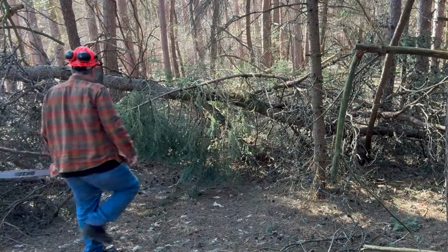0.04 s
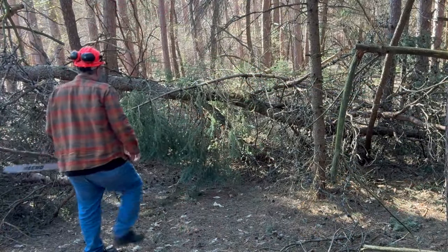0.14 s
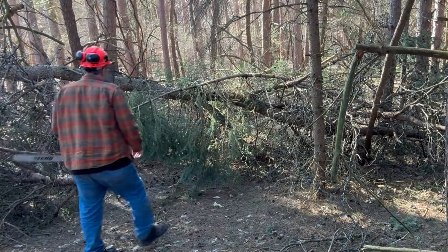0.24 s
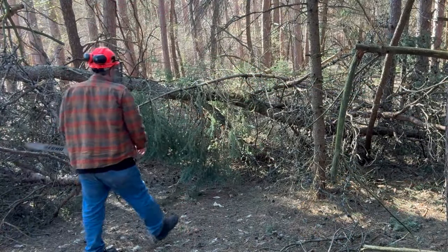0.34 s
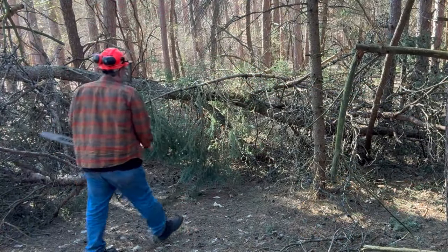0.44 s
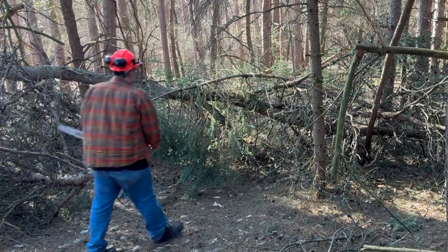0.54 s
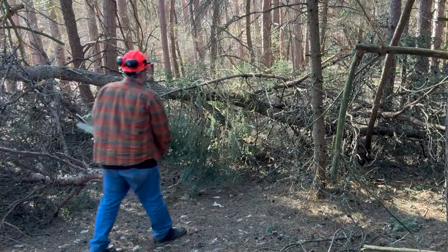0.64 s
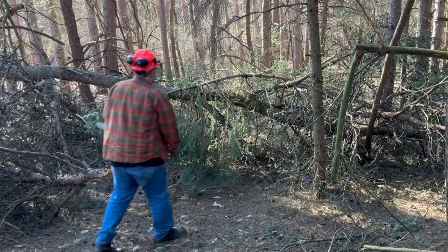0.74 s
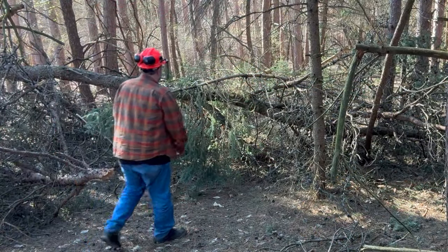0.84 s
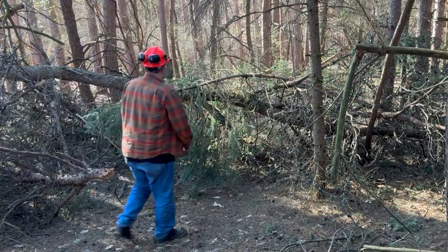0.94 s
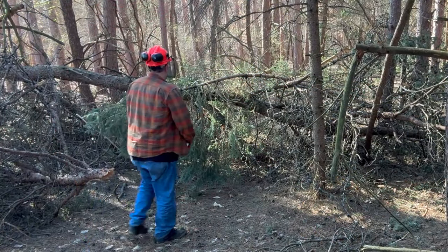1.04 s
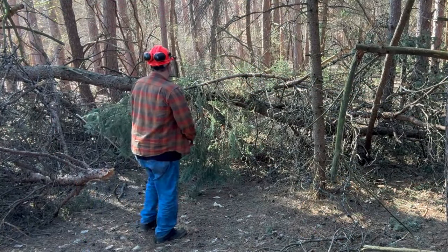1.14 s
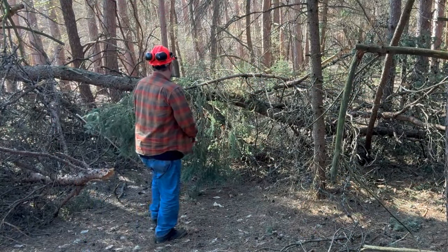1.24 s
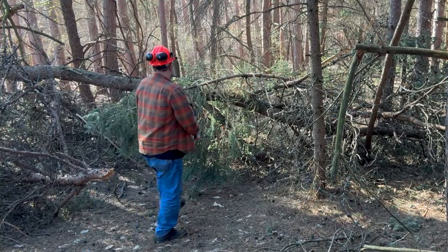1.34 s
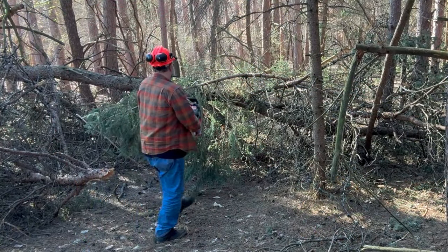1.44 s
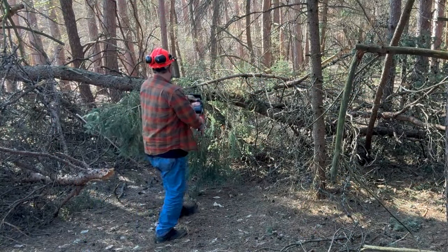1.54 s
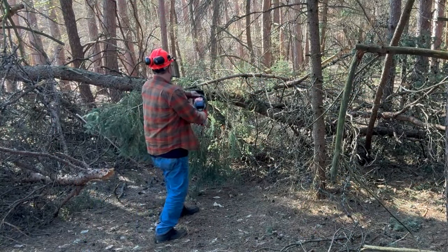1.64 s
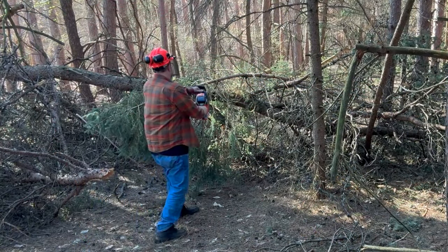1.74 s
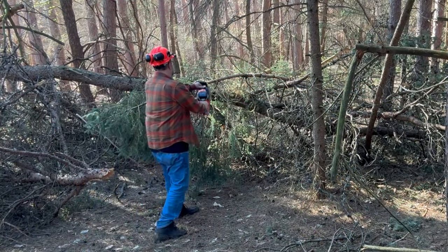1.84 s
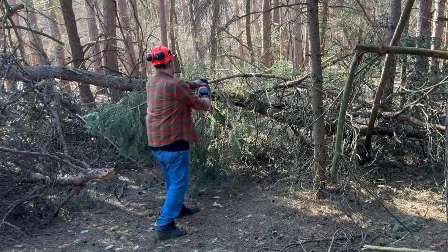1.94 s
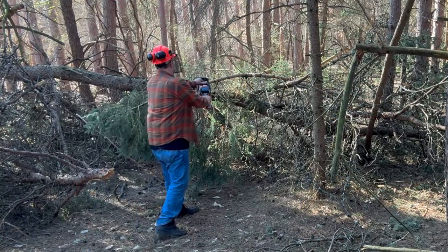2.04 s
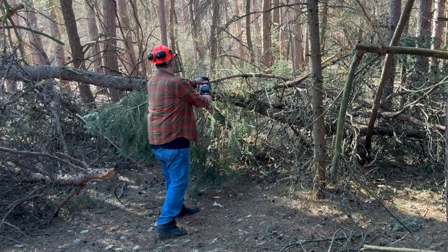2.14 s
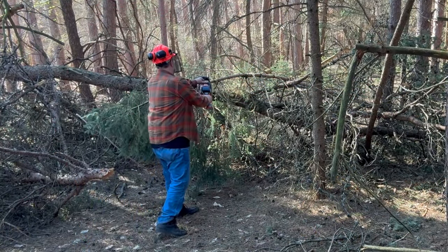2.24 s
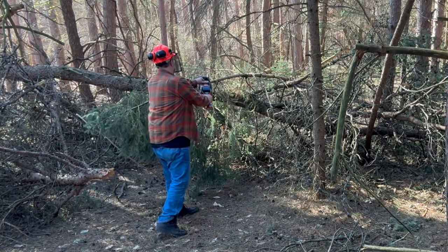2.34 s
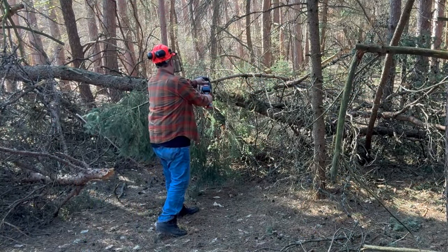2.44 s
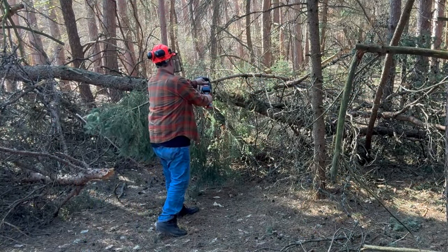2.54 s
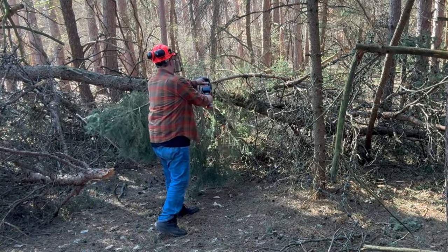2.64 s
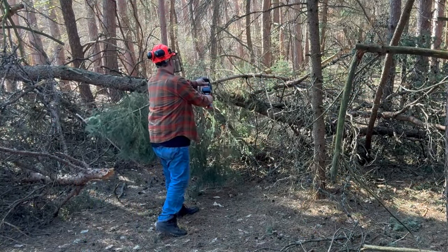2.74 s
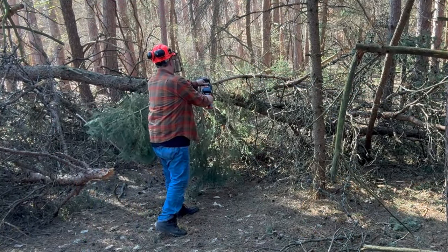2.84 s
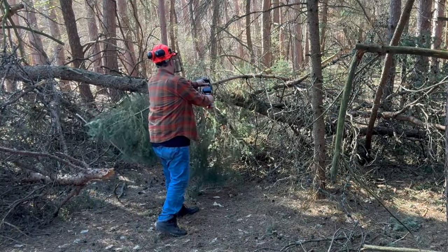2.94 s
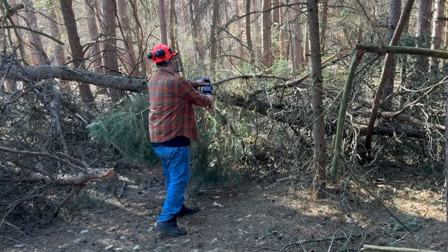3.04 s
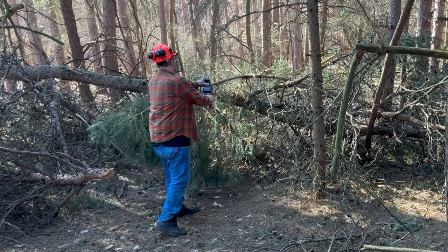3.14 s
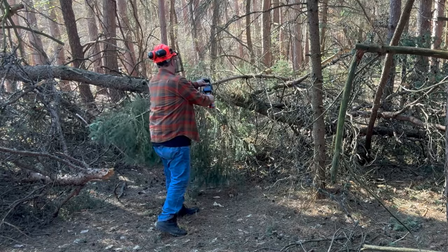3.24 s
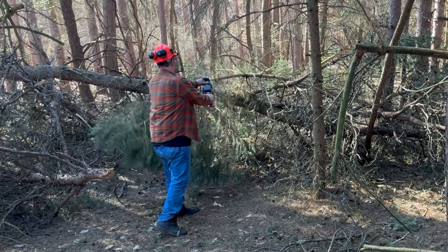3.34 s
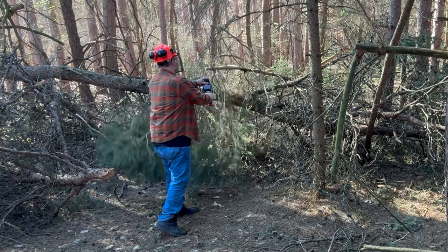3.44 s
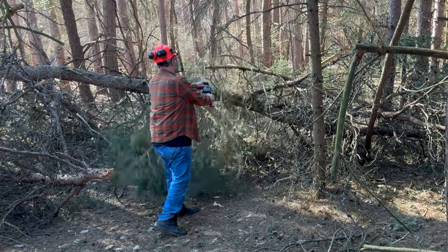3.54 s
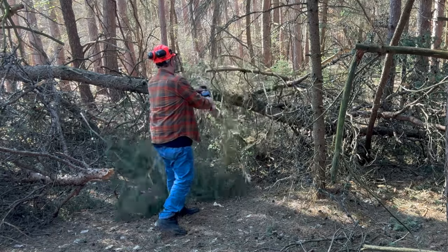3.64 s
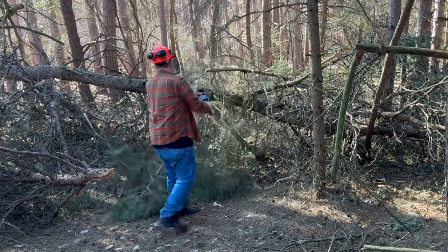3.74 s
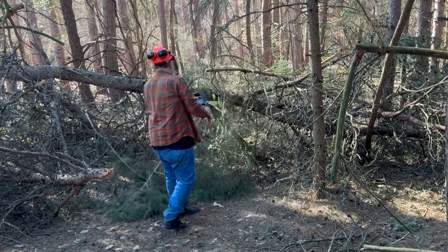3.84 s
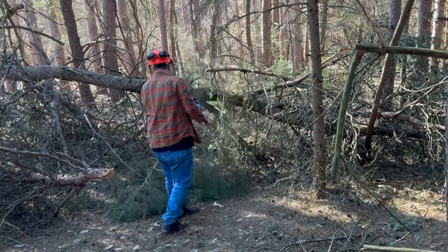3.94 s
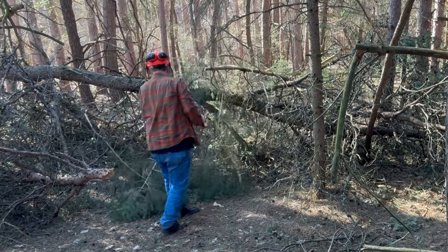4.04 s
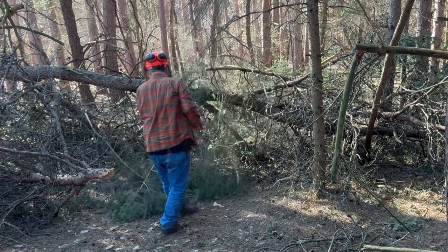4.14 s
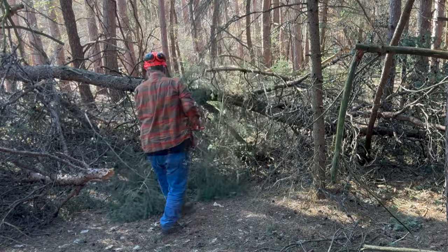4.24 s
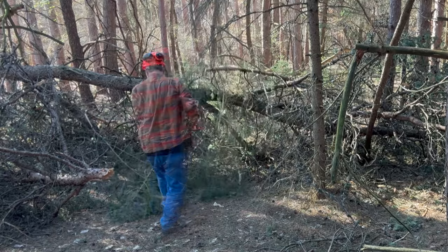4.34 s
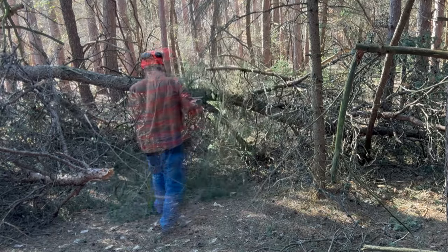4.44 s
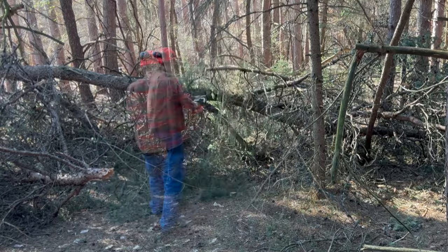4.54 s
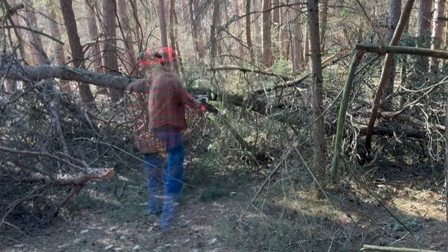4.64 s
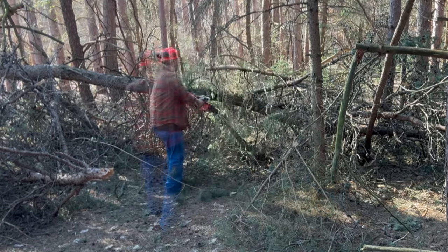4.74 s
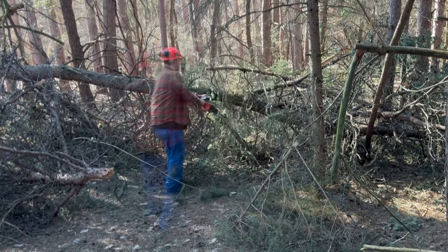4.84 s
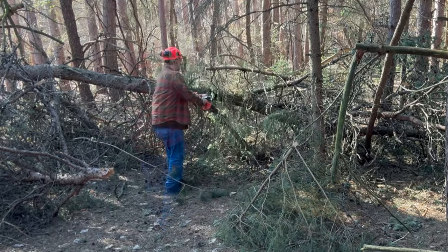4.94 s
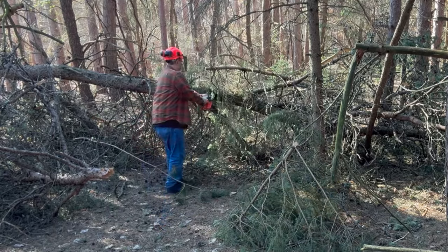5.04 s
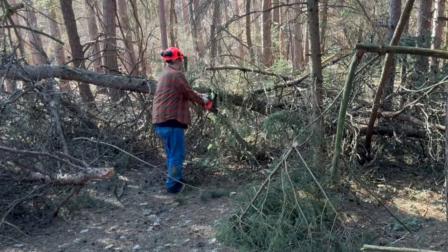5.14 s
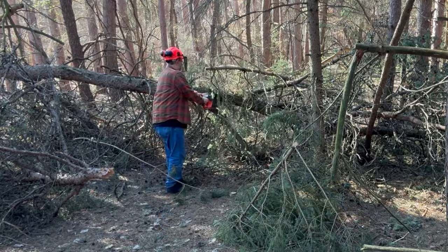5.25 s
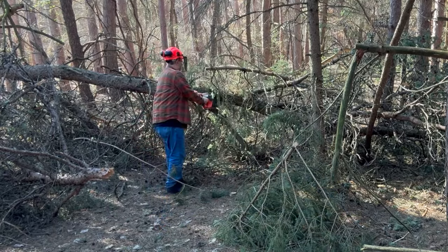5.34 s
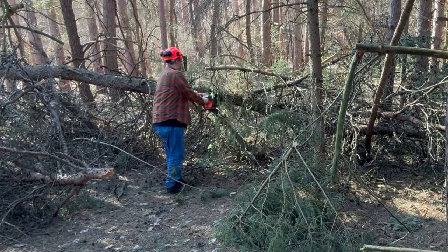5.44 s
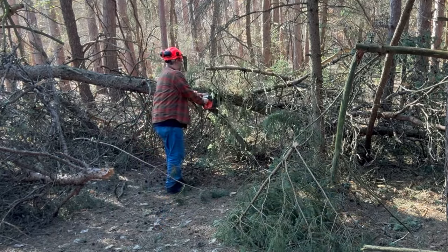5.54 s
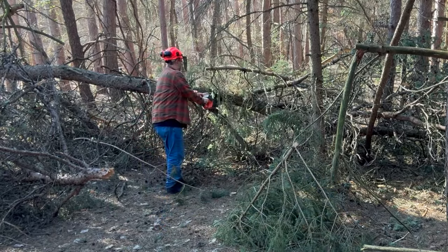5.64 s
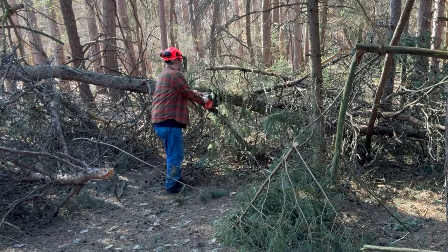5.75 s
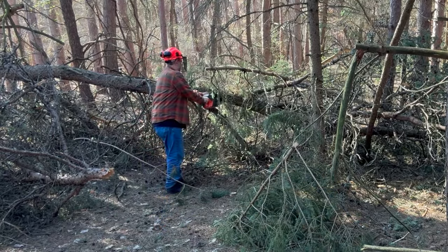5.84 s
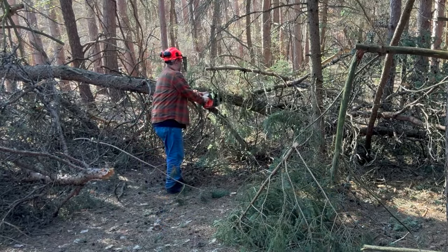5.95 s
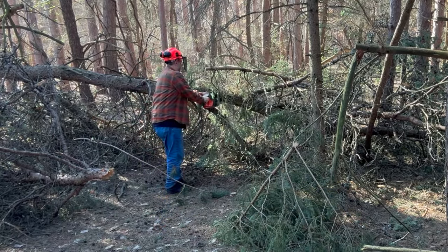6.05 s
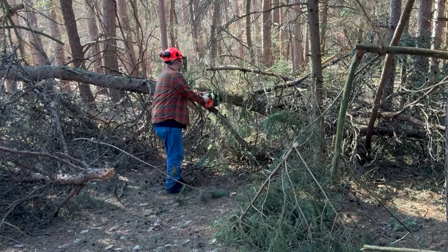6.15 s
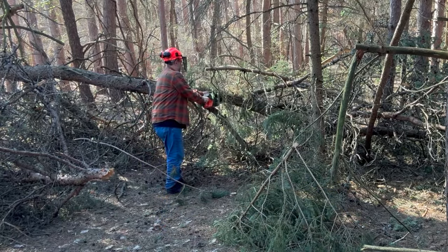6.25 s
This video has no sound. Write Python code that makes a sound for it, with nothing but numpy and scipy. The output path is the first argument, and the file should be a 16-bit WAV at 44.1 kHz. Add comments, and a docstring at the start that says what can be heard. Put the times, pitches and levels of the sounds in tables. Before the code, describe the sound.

A still forest with a soft low murmur and slight wind rumble, heard in stereo from a few metres away. From 0 to 1.6 s, light steps crackle on dry needles; around 0.3 s soft distant whistles, probably birds, blur away among the trees. Twigs brush near 1.5 s, and low gusts bump the microphone around 1.7 to 1.95 s with small knocks at 1.9. At about 2.05 s a battery chainsaw starts with loose chain clatter and a knock, sweeping up to a full buzzing whine with rattle and hiss by 3.0 s. The rattle eases slightly at 3.1; pitch peaks near 3.6, then falls until the brake cuts it at 4.1 s with a clack. In the lull, a faint whistle, a dragged branch rustling, and crunching twigs at 4.8. Knocks accompany the second start from 4.75; it climbs to a steadier, wavering whine by 5.8 and runs to the end.

```python
"""Limbing a fallen pine

A man walks over dry needles to a fallen pine and limbs it with a battery chainsaw, a few metres away
in a still forest. The saw winds up, takes off a branch and is braked; a second run follows.
One shaft phase drives the sprocket tone, the motor whine and the chain's noise pulses and slaps.
Shaped noise makes the steps, the knocks, the forest's murmur and the wind's rumble on the microphones;
wavering sines of fixed pitch make far whistles."""
import sys
import numpy as np
from scipy import signal
from scipy.fft import rfft, irfft, next_fast_len
from scipy.io import wavfile
from scipy.ndimage import uniform_filter1d

SR = 44100
rng = np.random.default_rng(int(sys.argv[2]) if len(sys.argv) > 2 else 0)


def wav_out(sig):
    """Save sig, one row per channel (or a flat mono array), as 16-bit PCM at SR to the path in sys.argv[1]."""
    wavfile.write(sys.argv[1], SR, np.round(np.clip(np.atleast_2d(sig).T, -1, 1) * 32767).astype(np.int16))


N = 277389
TIME = np.arange(N) / SR
SIZE = next_fast_len(N + SR // 2)
BINS = np.maximum(np.arange(SIZE // 2 + 1) * SR / SIZE, 1)  # spectrum frequencies in Hz
HALVES = np.array([[.5], [-.5]])  # shares a left-minus-right difference between the sides
WORKING_HZ = 700  # link rate at which levels are given

# coherence of the saw's and the litter's noise between the microphones: pitch_hz, likeness (0-1)
SAW_LIKENESS = [(150, 0.92), (350, 1), (700, 0.35), (1550, 1), (2200, 0.18), (5500, 0.88), (7800, 0.068),
                (9300, 1), (10500, 0.45), (12000, 1), (15000, 1)]


def from_db(db):
    """Amplitude gain is ten to the power of a twentieth of the decibels."""
    return 10 ** (np.asarray(db) / 20)


def rms_one(x):
    """Dividing by the root mean square gives a signal unit power."""
    return x / np.sqrt(np.mean(x ** 2) + 1e-20)


def level(rows):
    """An envelope linear in decibels between its rows, with Gaussian fades just outside them."""
    rows = np.array(rows)
    outside = np.maximum(rows[0, 0] - TIME, TIME - rows[-1, 0]).clip(0)
    fade = np.exp(-(outside / 0.027) ** 2)
    return from_db(np.interp(TIME, rows[:, 0], rows[:, 1])) * fade


def at_hz(points, hz=BINS):
    """A spectrum interpolated on a logarithmic frequency axis, as pitch is heard."""
    points = np.array(points)
    return np.interp(np.log(hz), np.log(points[:, 0]), points[:, 1])


def drift(rate_hz):
    """White noise through a two-pole low-pass becomes a slow random wander of unit power."""
    step = 40  # samples between the wander's points
    pole = np.exp(-2 * np.pi * rate_hz * step / SR)
    white = rng.standard_normal(N // step + 2002)
    slow = signal.lfilter([1], [1, -2 * pole, pole * pole], white)[2000:]
    return np.interp(np.arange(N) / step, np.arange(len(slow)), rms_one(slow))


def resonance_db(modes, hz):
    """Each resonance lifts or dips the level along a bell centred on its own frequency."""
    return sum(db / (1 + (2 * (hz - centre) / width) ** 2) for centre, width, db in modes)


def noise_spectra(colour_db, likeness):
    """Sum and difference of two independent noises set the coherence between the sides."""
    alike = np.clip(at_hz(likeness), 0, .99)
    mid, side = rfft(rng.standard_normal((2, SIZE)))
    pair = np.sqrt(1 + alike) * mid + np.sqrt(1 - alike) * side * [[1], [-1]]
    return pair * from_db(colour_db)


def unit_in_band(spectra, band):
    """By Parseval's theorem the bins in a band give its power: the centre signal's rms there is made 1."""
    inside = spectra.mean(0)[(BINS > band[0]) & (BINS < band[1])]
    return irfft(spectra, SIZE)[:, :N] * SIZE / np.sqrt(2 * np.sum(abs(inside) ** 2))


def with_speed(link_hz, db_per_octave):
    """Radiated level grows by a fixed number of decibels per doubling of chain speed."""
    return from_db(db_per_octave * np.log2(link_hz / WORKING_HZ))


def saw(speed, response, swing, shell, colour, bar, load, axis, tone_db, octave_db, ragged_db,
        whine_db, slow_whine_db, rattle_db, slow_rattle_db, hiss_db, hiss_db_per_octave,
        slack_db, slack_db_per_octave, slack_from_hz, motor_pan_db):
    """Synchronous sources: one pull of the trigger turns all parts with one shaft, which sets their levels."""
    creep_hz = 162  # below this link rate the chain hardly rattles
    smooth_speed = uniform_filter1d(np.interp(TIME, *np.transpose(speed)), size=SR // 30)
    link_hz = smooth_speed.clip(1) * (1 + .001 * drift(20))
    shaft = 2 * np.pi * np.cumsum(link_hz) / 6 / SR  # radians; six teeth a turn
    slowness = np.clip((WORKING_HZ - link_hz) / 350, 0, 1)

    tone = from_db(tone_db) * sprocket(response, swing, shaft, link_hz, slowness, octave_db, ragged_db)

    motion = with_speed(link_hz, 7) / np.hypot(1, (creep_hz / link_hz) ** 2)
    lines = drive(shaft, link_hz, slowness, shell, axis)
    whine = from_db(whine_db + slow_whine_db * slowness) * motion * lines
    panned_whine = whine * from_db(motor_pan_db * HALVES)

    shaking = from_db(rattle_db + slow_rattle_db * slowness) * motion * load
    sliding = from_db(hiss_db) * with_speed(link_hz, hiss_db_per_octave)

    # a slow chain is slack and slaps the bar
    slack = slowness ** 2 * with_speed(link_hz, slack_db_per_octave)
    slack = slack / np.hypot(1, (slack_from_hz / link_hz) ** 2)
    clatter = slaps(shaft, link_hz, from_db(rattle_db + slack_db) * slack, bar)
    return tone + place(panned_whine + clatter) + chain(shaking, sliding, colour, shaft)


def sprocket(response, swing, shaft, link_hz, slowness, octave_db, ragged_db, waver_db=1.3, blur=0.03):
    """Forced vibration: links on the teeth drive a tone and its octave through the bar's resonances."""
    seat_hz = 175  # below this link rate the links settle on the teeth without a tone
    out, swing = 0, np.array(swing)
    for k in (1, 2):
        hz = k * link_hz
        ragged = (k - 1) / 2 + slowness  # the octave and a slack chain are grainier
        pan_db, lead = at_hz(swing, hz), at_hz(swing[:, ::2], hz)
        # a slow run softens both partials, the octave less
        gain_db = at_hz(response, hz) + (k - 2.5) * octave_db * slowness
        gain_db = gain_db + waver_db * drift(9.2) + ragged_db * ragged * drift(49)
        radiated = 1 / np.sqrt(1 + (240 / hz) ** 12)
        phase = 6 * k * shaft + blur * ragged * drift(45) + HALVES * lead
        out = out + from_db(gain_db + HALVES * pan_db) * radiated * np.sin(phase)
    seated = 1 / np.hypot(1, (seat_hz / link_hz) ** 8)
    return np.sqrt(2) * out * seated * with_speed(link_hz, 9)


def drive(shaft, link_hz, slowness, shell, axis, low_cut_hz=360, slow_treble_db=-20):
    """Order lines of a rotating machine, wavering as their paths among the trunks shift.

    The highest need speed, and the small housing radiates little bass."""
    # drive lines: order (multiple of the shaft rate; 6 is sprocket teeth, 21 the motor's magnetic pull)
    orders = (3, 4, 5, 7, 8, 9, 10, 16, 18, 21, 24, 30, 36, 42, 48, 63)
    # relative levels of those lines, one row per run, columns in the same order: level_db
    order_db = [(-15, -14.5, -16, -12, -12.5, -11.5, -12.5, -26, -10.5, -12, -13.5, -12, -13, -7, -13.5, -10),
                (-21, -12, -11.5, -38, -14.5, -29, -10.5, -14.5, -14.5, -7, -12, -28, -14, -9, -24, -7)]
    out = 0
    for order, db in zip(orders, order_db[axis]):
        hz = order * link_hz / 6
        radiated = 1 / np.sqrt(1 + (low_cut_hz / hz) ** 8)
        slow_db = slow_treble_db * slowness * order / orders[-1]
        gain = from_db(db + resonance_db(shell, hz) + slow_db + 2 * drift(40)) * radiated
        phase = order * shaft + .3 * (hz / 1000) ** .25 * drift(40)
        in_step = (.85 + .36 * drift(9)) * np.sin(phase)
        quarter_off = .36 * drift(9) * np.cos(phase)
        out = out + gain * (in_step + quarter_off)
    return np.sqrt(2) * out


def chain(shaking, sliding, colour, shaft, pulse=0.042, flutter_db=1.0):
    """Friction noise: links rattle in the bar and hiss along it, modulated at the link and cutter rates."""
    # resonances of bar and housing: pitch_hz, width_hz, level_db
    housing = [(420, 120, 2), (1000, 150, 3), (1530, 160, 4), (1850, 150, 4), (2430, 280, 5.5),
               (3550, 350, 3), (4050, 250, -3), (4550, 250, 3), (9800, 1000, 3)]
    body_db = at_hz(colour) + resonance_db(housing, BINS)
    spectra = noise_spectra(body_db, SAW_LIKENESS) * bearing() / (1 + (110 / BINS) ** 4)
    treble = 1 / (1 + (5000 / BINS) ** 4)
    rattle = unit_in_band(spectra * (1 - treble), (1000, 4000)) * shaking
    hiss = unit_in_band(spectra * treble, (6000, 14000)) * sliding
    links = np.cos(6 * shaft + drift(10))
    cutters = np.cos(3 * shaft + drift(10))
    pulses = 1 + pulse * (links + cutters)
    return ground_echo((rattle + hiss) * pulses * from_db(flutter_db * drift(29)))


def slaps(shaft, link_hz, strength, modes, uneven_db=0.5, low_cut_hz=335, soft_hz=2500):
    """Impulse response: each slack link hits the oiled bar with its own force and rings its modes."""
    passing = np.diff(np.floor(6 * shaft / (2 * np.pi)), prepend=0)
    force = rms_one(from_db(uneven_db * drift(54) + 3.8 * rng.standard_normal(N)))
    # scaled so that the power does not depend on the link rate
    hits = passing * rng.choice([-1, 1], N) * np.sqrt(SR / link_hz) * force
    ringing = sum(from_db(db) / (1 + 2j * centre / width * np.log(BINS / centre))
                  for centre, width, db in modes)
    ringing = ringing / (1 + (low_cut_hz / BINS) ** 12) / (1 + 1j * BINS / soft_hz) ** 2
    ringing = ringing / np.sqrt(np.mean(abs(ringing) ** 2))
    return irfft(rfft(hits * strength, SIZE) * ringing, SIZE)[:N]


def bearing():
    """Interaural-style level and phase differences set a source's direction at the two microphones."""
    # balance of the saw between the microphones: pitch_hz, left_minus_right_db
    balance = [(270, -1), (450, -3), (750, -3.5), (1000, 3.5), (1250, 4.5), (1900, -4.5), (2500, 0),
               (3500, -2), (9000, 0)]
    # phase of the saw between the microphones: pitch_hz, left_lead_rad
    phase_lead = [(100, 0.6), (520, 0.07), (820, 1.47), (1400, 0.56), (1850, -0.2), (2350, 1), (3200, 1),
                  (5200, 2.34), (6600, 2.75), (8000, 6.4), (9100, 9.09), (11400, 11.54), (12700, 12.2),
                  (14400, 15.7)]
    return from_db(HALVES * at_hz(balance)) * np.exp(1j * HALVES * at_hz(phase_lead))


def place(x):
    """Filtering by the bearing puts a point source at the saw."""
    return irfft(rfft(x, SIZE) * bearing(), SIZE)[:, :N]


def ground_echo(x, delay_s=.0027, sway=0.055, echo_db=-8):
    """Comb filtering: a near ground echo, its delay shifting as the saw moves, makes the colour wander."""
    late = TIME - delay_s * (1 + sway * drift(1.17))
    echo = np.array([np.interp(late, TIME, side) for side in x])
    return (x + from_db(echo_db) * echo) / np.hypot(1, from_db(echo_db))


def knocks(crack_db=-20):
    """Impact excitation: short blows sound a broad, damped resonance under a brief crack."""
    # knocks of wood, snatches of the chain and the clunk of the brake (4.088 s and 4.09 s): start_s,
    # resonance_peak_db, pitch_hz, width_hz, t60_s
    blows = [(1.882, -48, 1080, 350, 0.035), (1.883, -39.5, 725, 220, 0.025),
             (1.777, -62, 1190, 430, 0.059), (1.954, -56, 890, 330, 0.054), (2.150, -38, 760, 110, 0.037),
             (2.188, -31, 740, 91, 0.13), (4.088, -33, 685, 69, 0.028), (4.09, -44.5, 375, 89.5, 0.14),
             (4.672, -41.5, 597, 219, 0.034), (4.843, -53, 1190, 440, 0.033), (4.883, -45, 710, 350, .06),
             (4.942, -38.5, 505, 150, .14), (4.993, -41, 426, 60, 0.15), (5.078, -32, 555, 70, 0.059),
             (5.395, -30.5, 1070, 390, 0.21)]
    out = np.zeros(N + SR)
    age = TIME[:SR // 5]
    for s, db, hz, width, t60 in blows:
        burst = rng.standard_normal(len(age)) * from_db(-60 * age / t60)
        edges = hz * np.exp(np.array([-.5, .5]) * width / hz)
        body = signal.sosfilt(signal.butter(2, edges, "band", fs=SR, output="sos"), burst)
        crack = signal.sosfilt(signal.butter(1, [hz, 4 * hz], "band", fs=SR, output="sos"), burst)
        start = round(s * SR)
        out[start:start + len(age)] += from_db(db) * (body / abs(body).max() + from_db(crack_db) * crack)
    return place(out[:N])


def litter(attack_s=0.008, grain_db=3.0, snap_db=5.5):
    """Fracture noise: needles crackle finely, twigs crunch lower and coarser.

    Each step starts sharply and dies away; the dragged branch swells."""
    # needles and twigs crushed underfoot: start_s, needles_db, twigs_db, t60_s
    steps = [(0.02, -83, -85, 1.1), (0.1, -77, -78, 0.27), (0.413, -64.5, -77, 0.26),
             (0.497, -76, -80, 1.7), (0.83, -76, -79, 0.19), (1.12, -84, -84, 0.45), (1.27, -80, -80, 0.21),
             (1.522, -72.5, -85, 0.68), (1.555, -70, -74, 0.18), (1.779, -82, -88, 0.1),
             (1.88, -83, -73, 0.26), (1.952, -90, -76, 0.08), (4.764, -68, -56, 0.064),
             (4.8, -53, -72, 0.024), (4.84, -55, -66, 0.046)]
    # the cut branch is dragged aside: time_s, level_db
    drag = [(4.2, -81), (4.3, -100), (4.43, -82), (4.57, -72), (4.73, -73), (4.82, -88)]
    # twigs brush along the bar as the saw is lifted: time_s, level_db
    brush = [(1.51, -84), (1.55, -74), (1.61, -78), (1.645, -90)]
    # spectrum of the needles: pitch_hz, density_db
    needle_colour = [(1800, 6), (2800, 3), (4500, 2.5), (6500, 8.5), (9000, 1.5), (12000, -3.5), (15000, 3)]
    # spectrum of the twigs: pitch_hz, density_db
    twig_colour = [(900, 16), (1700, 0), (2700, 10), (3700, -4), (4500, -16), (9000, -21)]
    fine, coarse = level(drag), level(brush)
    for s, needles_db, twigs_db, t60 in steps:
        age = np.clip(TIME - s, 0, None)
        press = np.minimum(age / attack_s, 1) * from_db(-60 * age / t60)
        fine = fine + from_db(needles_db) * press
        coarse = coarse + from_db(twigs_db) * press
    needles = noise_spectra(at_hz(needle_colour), SAW_LIKENESS) * bearing() / (1 + (1500 / BINS) ** 4)
    twigs = noise_spectra(at_hz(twig_colour), SAW_LIKENESS) * bearing() / (1 + (700 / BINS) ** 4)
    crackle = unit_in_band(needles, (4000, 14000)) * fine * from_db(grain_db * drift(200))
    crunch = unit_in_band(twigs, (1000, 5000)) * coarse * rms_one(from_db(snap_db * drift(170)))
    return crackle + crunch


def trees(x, t60=0.9, dull_hz=5000):
    """Multiple scattering: trunks return many small echoes, different on each side."""
    age = TIME[:SR // 2]
    sparse = (rng.random((2, len(age))) < .03) * (age > .006)
    echoes = rng.standard_normal((2, len(age))) * sparse * from_db(-60 * age / t60)
    echoes /= np.sqrt(np.sum(echoes ** 2, axis=1, keepdims=True))
    dulling = 1 / (1 + 1j * BINS / dull_hz)
    return irfft(rfft(x, SIZE) * rfft(echoes, SIZE) * dulling, SIZE)[:, :N]


def far_calls(rise_s=0.012):
    """Reverberant decay: soft notes, held briefly, blur and die away among the trees."""
    # distant whistled notes, probably birds: start_s, pitch_hz, level_db, hold_s, t60_s
    notes = [(.16, 2170, -76, .06, .8), (.31, 1185, -67, .04, .6), (.36, 1220, -70.5, .42, 1.2),
             (.315, 1396, -59, .15, .7), (.315, 2094, -66, .06, .9), (.33, 4190, -79, .06, .5),
             (.47, 4290, -76, .18, 1.2), (4.34, 4290, -75, .16, .6), (4.52, 1335, -64, .1, 1.8)]
    out = 0
    for s, hz, db, hold, t60 in notes:
        age = np.clip(TIME - s, 0, None)
        tone = np.sin(2 * np.pi * hz * age + .5 * drift(45)) * from_db(2.5 * drift(25))
        decay_db = -60 * np.clip(age - hold, 0, None) / t60
        out = out + np.minimum(age / rise_s, 1) * from_db(db + decay_db) * tone
    return out * np.array([[1], [-.4]])  # right side weaker and inverted


def air(unrest_db=4.0):
    """Broadband ambience and turbulence: the far murmur of the forest, breeze and gusts on the microphones."""
    # spectrum of the murmur: pitch_hz, density_db
    murmur_colour = [(60, 11), (150, -11), (250, -7.5), (420, -0.5), (700, -4), (1000, -14.5),
                     (1600, -23.5), (2700, -30.5), (4000, -32), (6000, -39), (10000, -48), (15000, -69)]
    # spectrum of the wind: pitch_hz, density_db
    wind_colour = [(20, -6), (40, -2.5), (65, 7), (100, -12.5), (160, -18), (400, -43)]
    # coherence of both between the microphones: pitch_hz, likeness (0-1)
    likeness = [(60, 0.4), (300, 0.78), (600, 0.05), (2000, 0.026), (10000, .1)]
    # gusts on the microphones: centre_s, peak_db, half_length_s
    gust_rows = [(0.155, -63.5, .14), (0.624, -65.5, 0.19), (1.507, -60, 0.11), (1.7, -54, 0.065),
                 (1.827, -49, 0.072), (1.93, -51, 0.085), (2.153, -60, 0.036), (3.15, -56, 0.15),
                 (3.903, -60, 0.048)]
    murmur = noise_spectra(at_hz(murmur_colour), likeness) / (1 + (85 / BINS) ** 6)
    wind = noise_spectra(at_hz(wind_colour), likeness) / (1 + (BINS / 400) ** 2)
    # the breeze between gusts slowly dies down, by 4.5 dB a second
    breeze = from_db(-67.5 - 4.5 * TIME + unrest_db * drift(8.1))
    gusts = sum(from_db(db) * np.exp(-((TIME - s) / half) ** 2) for s, db, half in gust_rows)
    forest = from_db(-64.5) * unit_in_band(murmur, (200, 4000))
    return forest + np.hypot(breeze, gusts) * unit_in_band(wind, (25, 150))


def scene():
    """Superposition: two runs of the saw, steps and knocks, with the forest's echo and air."""
    # drive links passing the sprocket, one table per run: time_s, link_rate_hz
    speed_1, speed_2 = [(2.02, 0), (2.07, 105), (2.2, 185), (2.4, 364), (2.68, 594), (2.83, 696),
                        (3.02, 816), (3.22, 806), (3.32, 786), (3.42, 860), (3.58, 874), (3.7, 796),
                        (3.85, 663), (3.95, 574), (4.14, 410)], [(4.74, 0), (4.8, 55), (4.87, 100), (5.02, 224), (5.21, 390),
                                         (5.29, 452), (5.38, 540), (5.51, 592), (5.62, 690), (5.75, 676),
                                         (5.86, 756), (5.96, 713), (6.09, 737), (6.29, 656)]
    # how strongly the bar sends out the sprocket tone, for each way the saw is held: pitch_hz, level_db
    response_1, response_2 = [(260, -51), (320, -32.5), (380, -27), (440, -34.5), (478, -31.5),
                              (520, -45.5), (560, -34), (610, -40), (685, -32), (755, -22), (790, -25.5),
                              (820, -29), (870, -36.5), (950, -48.5), (1100, -36.5), (1220, -42.5),
                              (1450, -50), (1620, -48.5), (1760, -47.5)], [(300, -76), (400, -26), (455, -22), (525, -40),
                                                  (570, -35.5), (610, -50), (665, -34), (690, -30.5),
                                                  (730, -30.5), (760, -24), (830, -28.5), (970, -31.5),
                                                  (1130, -41), (1220, -40), (1390, -49.5), (1460, -42.5)]
    # the tone swings between the microphones as it sweeps: pitch_hz, left_minus_right_db, left_lead_rad
    swing_1, swing_2 = [(400, 0.5, 0), (546, -6, 0.31), (630, -6, .8), (700, -4.5, 1.15), (795, -0.5, 1.48),
                        (864, 2, 1.6), (864, 4.5, 1.2), (1000, 4, 1), (1800, -2.5, 0)], [(410, 0, .1), (540, -4, .2), (580, -9, 0.78), (696, -3, 0.31),
                                         (704, -11, 2.15), (729, -6.5, 1.95), (760, 8.5, 2.84),
                                         (890, 3, 1.5), (1460, -1, .1)]
    # shell resonances that the drive lines sweep through: pitch_hz, width_hz, level_db
    shell_1, shell_2 = [(750, 70, 8), (1090, 120, 3), (1570, 130, 5), (2500, 350, 6.5), (4100, 900, -4),
                        (6100, 600, 6)], [(430, 60, 5), (750, 70, 6), (980, 90, 5), (1540, 120, 7),
                                         (1900, 200, 1.5), (2480, 350, 7), (3550, 250, 8), (4100, 900, -4)]
    # chain noise spectrum, which changes as the bar is turned: pitch_hz, density_db
    colour_1, colour_2 = [(200, -11), (280, -15.5), (400, -1.5), (560, -2.5), (800, 12), (1100, 5),
                          (1500, 1.5), (2100, 1.5), (3000, 1), (4200, -2.5), (6000, 1), (7800, -3.5),
                          (9500, -4), (13000, -6.5)], [(200, -20), (280, -3), (400, 0), (560, 10), (1100, 8),
                                            (1500, 4.5), (2100, 5), (3000, 2.5), (4200, -5), (6000, -8.5),
                                            (7800, -16), (9700, -8.5), (12000, -16.5), (14000, -19.5)]
    # bar modes that a slack chain sets ringing: pitch_hz, width_hz, level_db
    bar_1, bar_2 = [(390, 23, -3), (457, 58, 4), (751, 15, 16), (834, 38, 11), (1140, 30, -23),
                    (1260, 46, 5.5), (1910, 23, -23), (2325, 31, -29)], [(409, 20, 6.5), (544, 42, 8.5), (866, 28, 6.5), (1490, 64, 0.5),
                                   (1900, 62, -16), (2350, 43, -22), (2440, 58, -28)]

    # the branch gives way; the freed chain soon rattles less
    through_s, free_s, free_db = 3.1, 0.016, -3.5
    freed = from_db(free_db * np.clip((TIME - through_s) / free_s, 0, 1))
    first = saw(speed_1, response_1, swing_1, shell_1, colour_1, bar_1, freed, axis=0,
                tone_db=1.0, octave_db=3.0, ragged_db=2.0, whine_db=-40.5, slow_whine_db=1,
                rattle_db=-39.0, slow_rattle_db=2.5, hiss_db=-44.5, hiss_db_per_octave=10.0,
                slack_db=8.0, slack_db_per_octave=6.5, slack_from_hz=85, motor_pan_db=2.5)
    second = saw(speed_2, response_2, swing_2, shell_2, colour_2, bar_2, np.ones(N), axis=1,
                 tone_db=-0.9, octave_db=6.0, ragged_db=0.1, whine_db=-39.0, slow_whine_db=-4.5,
                 rattle_db=-39.0, slow_rattle_db=3.5, hiss_db=-38.5, hiss_db_per_octave=9.5,
                 slack_db=-0.5, slack_db_per_octave=2.5, slack_from_hz=157, motor_pan_db=0.5)
    # the brake silences the first run almost at once
    brake_s, brake_db_per_s = 4.105, 600
    braked = from_db(-brake_db_per_s * np.clip(TIME - brake_s, 0, 1))
    near = braked * first + second + knocks() + litter()
    return near + from_db(-12.5) * trees(near) + far_calls() + air()


def record(dry):
    """Band limiting: a steep elliptic low-pass cuts the top."""
    cutoff_hz = 15500
    return signal.sosfilt(signal.ellip(10, .2, 80, cutoff_hz, fs=SR, output="sos"), dry)


dry = scene()
out = record(dry)
wav_out(out)
```